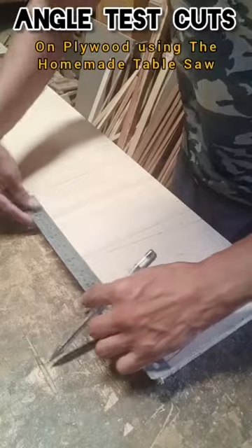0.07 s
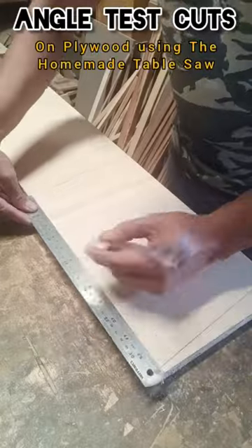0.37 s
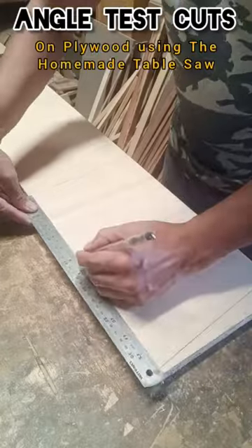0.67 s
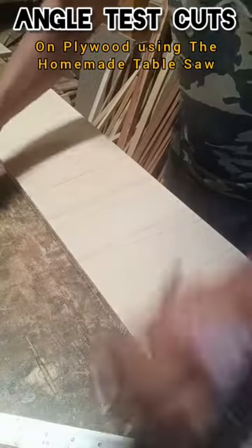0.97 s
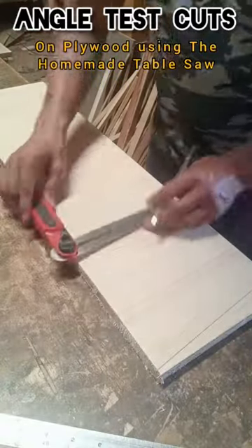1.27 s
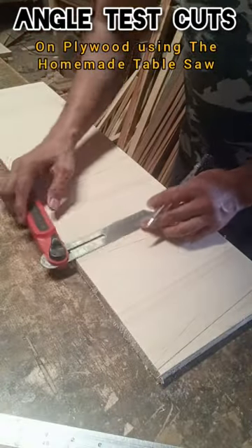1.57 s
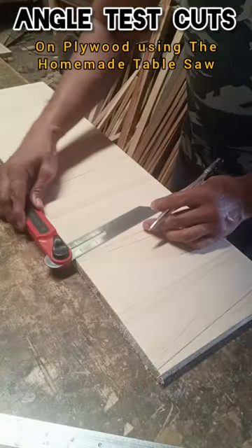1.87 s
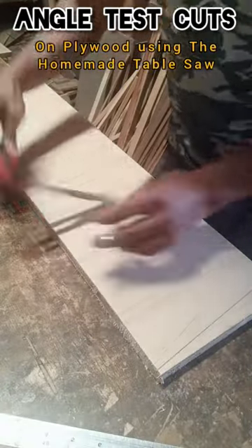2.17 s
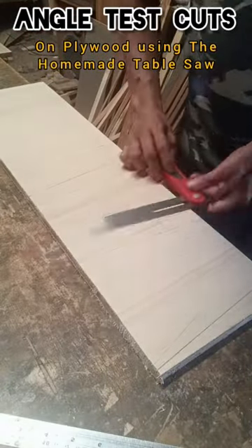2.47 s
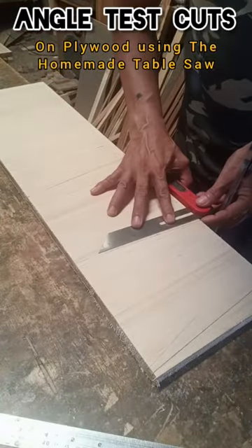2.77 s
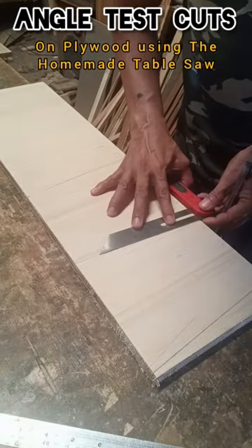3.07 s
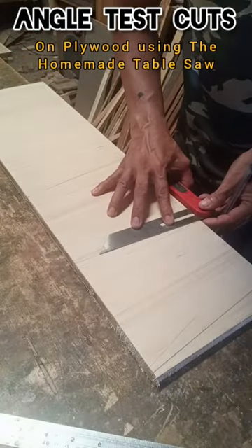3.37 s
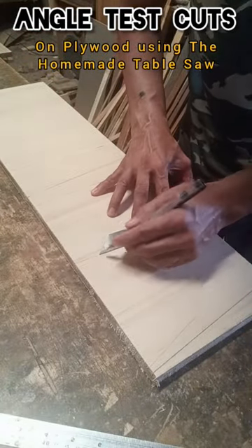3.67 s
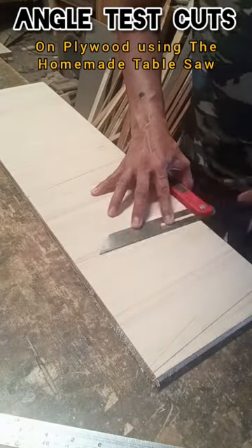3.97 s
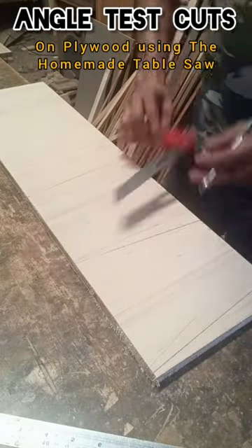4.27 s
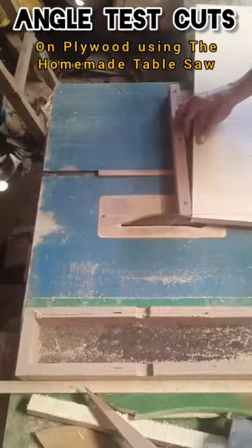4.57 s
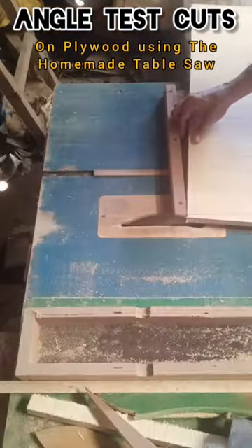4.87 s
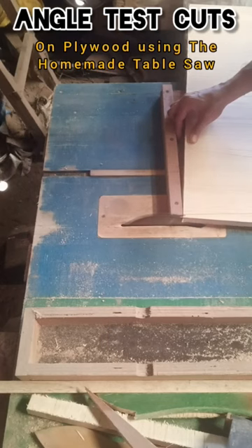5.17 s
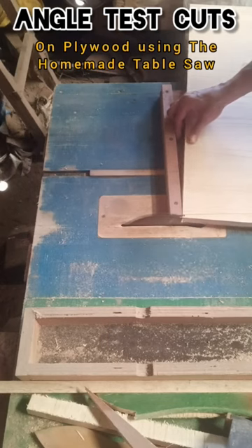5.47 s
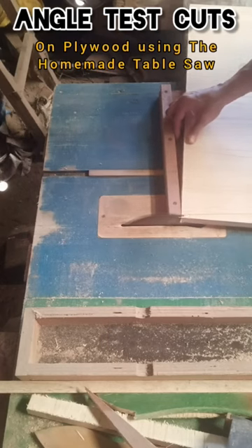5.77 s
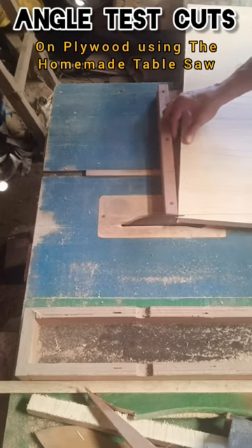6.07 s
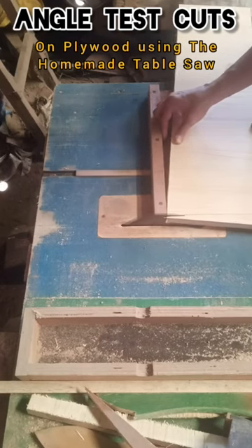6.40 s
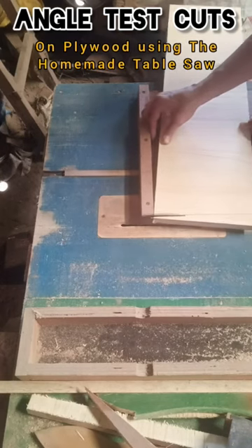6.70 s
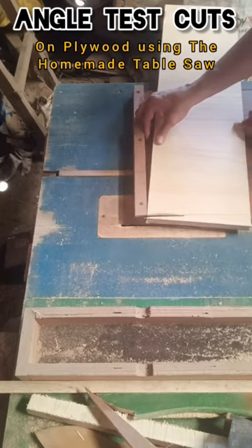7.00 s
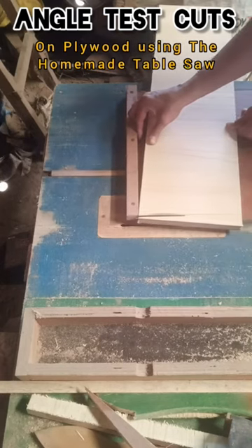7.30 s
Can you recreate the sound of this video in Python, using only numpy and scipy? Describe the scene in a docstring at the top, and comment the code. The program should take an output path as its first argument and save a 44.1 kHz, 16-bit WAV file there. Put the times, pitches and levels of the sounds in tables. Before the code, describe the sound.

Quiet scrapes, knocks and pencil strokes on plywood in a workshop, then a loud table saw suddenly runs and cuts the board.

```python
"""A workshop, through a stereo microphone pair. First, at the bench and a little to the right, a steel rule
and a bevel gauge are slid and set down on a plywood board. A pencil marks it as a distant rumble swells.
At 4.45 s the scene cuts to a table saw running close by: the motor hums and whines, the teeth churn the air.
Then the plywood is fed in: the teeth chop it and fling out chips and dust, the blade rings and squeals,
and toward the end the speed sags and the blade's draught thumps the microphones."""
import sys
import numpy as np
from scipy import signal
from scipy.fft import rfft, irfft
from scipy.io import wavfile
from scipy.ndimage import uniform_filter1d, map_coordinates

SR = 44100
rng = np.random.default_rng(int(sys.argv[2]) if len(sys.argv) > 2 else 0)


def inscribe(sig):
    """Save sig as 16-bit PCM at rate SR to the path in sys.argv[1].

    A 1-D sig is mono; a 2-D sig holds one channel per row.
    Samples are clipped to [-1, 1] before scaling.
    """
    pcm = np.round(np.clip(np.atleast_2d(sig).T, -1, 1) * 32767)
    wavfile.write(sys.argv[1], SR, pcm.astype(np.int16))


N = 323694
TIME, HZ = np.arange(N) / SR, np.fft.rfftfreq(N, 1 / SR)


def amp(db):
    """Decibels to gain."""
    return 10 ** (np.asarray(db) / 20)

def unit(x):
    """Scales to rms 1."""
    return x / np.sqrt(np.mean(x ** 2) + 1e-20)

def curve(points):
    """Joins (time, value) points by straight lines."""
    return np.interp(TIME, *np.transpose(points))

def spectrum(points):
    """Joins (frequency, value) points on a log-frequency axis."""
    hz, value = np.transpose(points)
    return np.interp(np.log(HZ + 1), np.log(hz + 1), value)

def tone(points):
    """Gain per frequency from (frequency, dB) points."""
    return amp(spectrum(points))

def peaks(modes):
    """Gain of resonances given as (frequency, width, dB)."""
    return sum(amp(db) / (1 + (2 * (HZ - hz) / width) ** 2) for hz, width, db in modes)

def colour(x, gain):
    """Filters x by a gain per frequency; rms 1."""
    return unit(irfft(rfft(x) * gain, N))

def noise():
    """Two unrelated white noises."""
    return rng.standard_normal((2, N))

def wander(rate_hz):
    """Random drift of rms 1."""
    knots = rng.standard_normal(int(2 * rate_hz * N / SR) + 2)
    return unit(np.interp(TIME * 2 * rate_hz, np.arange(len(knots)), knots))

def bump(at, width, shape=2):
    """A smooth rise and fall: 1 at its centre, 1/e one width to either side."""
    return np.exp(-np.minimum(abs((TIME - at) / width), 9) ** shape)

def patchy(x, depth_db, bins, frames):
    """Narrow bands swell and fade each on their own."""
    bands = signal.stft(x, nperseg=1024)[2]
    field = uniform_filter1d(rng.standard_normal(bands.shape[1:]), bins, axis=0)
    field = unit(uniform_filter1d(field, frames, axis=1))
    return unit(signal.istft(bands * amp(depth_db * field), nperseg=1024)[1][:, :N])

def mic_pair(pair, likeness, balance_db=0, lead=0):
    """Two signals become a left and a right microphone whose middle keeps its level."""
    a, b = rfft(pair)
    tilt = amp(balance_db / 2)
    right = (likeness * a * np.exp(-1j * lead) + np.sqrt(1 - likeness ** 2) * b) / tilt
    middle = np.sqrt(tilt ** 2 + tilt ** -2 + 2 * likeness * np.cos(lead)) / 2
    return irfft(np.array([a * tilt, right]) / middle, N)


# distant rumble: (time [s], level [dB]); its tone and the room air's: (frequency [Hz], level [dB])
RUMBLE_LEVEL = [(.1, -75.5), (1.6, -67), (2.65, -63), (3.45, -55), (4.0, -41.5), (4.2, -51), (4.44, -46)]
RUMBLE_TONE = [(30, -22), (90, -8), (170, -3), (222, 2.5), (300, -12), (400, -8), (500, -14.5), (700, -24),
               (2000, -35), (3500, -51), (15000, -57)]
AIR_TONE = [(15, -32), (25, 3), (109, 6), (250, -8), (749, -16.5), (1580, -18.5), (3010, -32.5),
            (15000, -41)]
def room_tone():
    """Still workshop air, and a low rumble swelling in the distance."""
    rumble = amp(curve(RUMBLE_LEVEL)) * colour(noise(), tone(RUMBLE_TONE))
    air = amp(-67) * colour(noise(), tone(AIR_TONE))
    return rumble + air

def friction(gain, grain_db):
    """Sliding catches on the wood grain, so the hiss comes in tiny clumps."""
    return colour(noise() * amp(grain_db * wander(400)), gain)

def stroke(at, width, db):
    """Power of one hand movement, speeding up and slowing down."""
    return amp(db) ** 2 * bump(at, width, shape=1.78)

# hiss of rubbed plywood: (frequency [Hz], level [dB])
HISS_TONE = [(1700, 3.5), (3700, -3), (4800, -0.5), (6500, -7.5), (8200, -5), (9400, 0), (11000, -14.5),
             (13000, -10), (15500, -15)]
# pencil strokes: (time [s], width [s], hiss [dB], board [dB])
PENCIL_STROKES = [(0.351, 0.0074, -74, -67), (3.738, 0.0083, -68, -49), (3.891, 0.027, -51, -36.5),
                  (3.927, 0.01, -48.5, -47), (4.053, 0.039, -63.5, -38.5)]
# pencil squeaks: (time [s], width [s], level [dB])
SQUEAKS = [(3.7, 0.016, -68), (3.812, 0.023, -62)]
def pencil():
    """The lead hisses over the grain, drums on the board and now and then squeaks."""
    hiss = np.sqrt(sum(stroke(at, width, db) for at, width, db, _ in PENCIL_STROKES))
    drum = np.sqrt(sum(stroke(at, width, db) for at, width, _, db in PENCIL_STROKES))
    squeak = np.sqrt(sum(stroke(*row) for row in SQUEAKS))
    return (hiss * friction(tone(HISS_TONE), grain_db=3.5)
            + drum * friction(peaks([(214, 57, 7), (442, 130, 1.5), (1500, 870, -30)]), grain_db=2)
            + squeak * friction(peaks([(2330, 800, 0)]), grain_db=3.5))

# the rule's scrape: (time [s], level [dB]) and (frequency [Hz], level [dB])
RULE_LEVEL = [(.94, -66), (.962, -39.5), (.99, -29), (1.008, -31), (1.022, -46), (1.05, -67)]
RULE_TONE = [(60, -27), (170, 4.5), (400, 4.5), (2100, -2.5), (2500, -8.5), (6700, -11.5), (7500, 2),
             (8700, -3), (10500, -25), (15000, -25)]
def rule():
    """The steel rule scrapes across the board's edge."""
    sliding = (TIME > RULE_LEVEL[0][0]) & (TIME < RULE_LEVEL[-1][0])
    return sliding * amp(curve(RULE_LEVEL)) * friction(tone(RULE_TONE), grain_db=1)

# the gauge slides: (time [s], width [s], level [dB], extra weight on the board [dB])
SLIDES = [(0.696, .012, -66, -2), (1.192, 0.0056, -29, -12), (1.219, 0.015, -38, -5.5),
          (1.242, 0.014, -39.5, 2.5), (1.289, 0.023, -50, 1), (1.361, 0.0098, -49.5, -6),
          (1.464, 0.026, -54, -1), (1.568, 0.015, -43.5, -12), (1.661, 0.0096, -60, 4.5),
          (1.971, .017, -53.5, -6), (2.032, .026, -54.5, 0), (2.323, 0.018, -55, 11.5),
          (2.372, 0.018, -49, 8.5), (2.469, 0.013, -40, -0.5), (2.533, 0.02, -47.5, -3)]
# it is whisked off: (time [s], width [s], hiss [dB], ring [dB])
LIFTS = [(2.216, 0.017, -47, -45), (4.288, 0.026, -53.5, -65)]
# the shaken board: (frequency [Hz], level [dB])
BOARD_TONE = [(70, -23), (140, -5.5), (190, 5), (270, -4), (400, -7), (700, -11.5), (1100, -58)]
# the gauge's blade: (frequency [Hz], width [Hz], level [dB])
GAUGE_MODES = [(802, 98, -3.5), (1034, 61, -4), (1344, 190, -3), (1650, 150, -6), (2096, 115, 6),
               (2314, 290, -1.5), (3210, 120, -13.5), (3790, 90, -12.5), (4680, 160, -18.5),
               (5070, 110, -15)]
def bevel_gauge():
    """Sliding the gauge shakes the board, rings its steel blade and hisses; lifting rings and hisses."""
    slide = sum(stroke(at, width, db) for at, width, db, _ in SLIDES)
    press = sum(stroke(at, width, db + weight_db) for at, width, db, weight_db in SLIDES)
    lift_hiss = sum(stroke(at, width, db) for at, width, db, _ in LIFTS)
    lift_ring = sum(stroke(at, width, db) for at, width, _, db in LIFTS)
    board = np.sqrt(press) * friction(tone(BOARD_TONE), grain_db=5.5)
    steel = patchy(friction(peaks(GAUGE_MODES), grain_db=4.5), depth_db=1.5, bins=4, frames=4)
    hiss = np.sqrt(amp(-13) ** 2 * slide + lift_hiss) * friction(tone(HISS_TONE), grain_db=2.5)
    return board + np.sqrt(slide + lift_ring) * steel + hiss

# tools are set down: (time [s], relative level [dB], dull above [Hz])
KNOCKS = [(0.9572, -7.5, 4930), (1.185, -19.5, 8700), (1.35, -26, 2960), (1.442, -20.5, 1700),
          (1.49, -25.5, 3370), (1.655, -36, 2210), (2.028, -37, 3000), (2.189, -33, 6000),
          (2.326, -13, 600), (2.369, -13, 4340), (2.459, -21.5, 4000), (2.542, -18.5, 1920),
          (2.662, -42.5, 2500), (4.303, -20, 1000)]
# the board with the gauge on it: (frequency [Hz], level [dB], time to fall 60 dB [s])
BOARD_MODES = [(178.4, -24, .09), (353, -9.5, 0.032), (503, -10.5, 0.023), (880, -15.5, 0.055),
               (1310, -2, 0.012), (1910, -2, 0.024), (2330, -18.5, .05), (3030, -22, .04),
               (4520, -11.5, 0.02)]
def knocks(crack_s=0.0018):
    """Each blow makes a contact crack and rings the modes of the board."""
    out, t = np.zeros((2, N)), TIME[:SR // 5]
    for at, db, dull_hz in KNOCKS:
        ring = sum(amp(mode_db - 60 * t / t60) * np.sin(2 * np.pi * (hz * t + 1.6 * rng.random((2, 1))))
                   for hz, mode_db, t60 in BOARD_MODES)
        crack = amp(3) * rng.standard_normal((2, len(t))) * np.exp(-t / crack_s)
        knock = signal.lfilter(*signal.butter(2, dull_hz, fs=SR), ring + crack)
        start = round(at * SR)
        out[:, start:start + len(t)] += amp(db - 15) * knock
    return out

# microphones at the bench: (frequency [Hz], left-right likeness [0-1])
BENCH_LIKENESS = [(130, 1), (300, 0.91), (700, 0.55), (1400, .2), (15000, 0.22)]
# the hands, right of centre: (time [s], left minus right [dB])
HANDS_PAN = [(1.0, -2), (1.6, -3.5), (2.2, -1.3)]
def bench():
    """At the bench: marking out the board, over the room tone."""
    likeness, pan = spectrum(BENCH_LIKENESS), amp(curve(HANDS_PAN) / 2)
    tools = mic_pair(bevel_gauge() + pencil() + rule() + knocks(), likeness)
    room = mic_pair(room_tone(), likeness, balance_db=-0.6) * (TIME > RUMBLE_LEVEL[0][0])
    return tools * np.array([pan, 1 / pan]) + room


# wind on the microphones: (time [s], width [s], level [dB])
BUFFETS = [(6.125, 0.027, -40), (6.714, 0.041, -33), (7.132, .045, -42), (7.285, .025, -38)]
def buffets():
    """The blade's draught thumps the microphones, mostly the right one."""
    gusts = sum(amp(db) * bump(at, width) for at, width, db in BUFFETS)
    return gusts * colour(noise(), peaks([(45, 99, 0)])) * amp([[-5], [4]])

# the saw's speed, as the pitch of its whine: (time [s], frequency [Hz])
WHINE_PITCH = [(4.46, 5152), (4.9, 5080), (5.25, 5033), (5.6, 5107), (5.75, 5068), (6.12, 5058),
               (6.6, 4964), (6.78, 4857), (7.02, 4862), (7.15, 4796), (7.34, 4820)]
WHINE_PER_TURN = 56.28
def shaft_turns():
    """Turns made so far by the shaft, which slows under load."""
    return np.cumsum(curve(WHINE_PITCH) / WHINE_PER_TURN) / SR

def feed_db(open_db, covered, loaded):
    """A layer's level, shifted in dB as the board covers the blade and as load drags the speed down."""
    cover = np.clip((TIME - 4.69) / 1.46, 0, 1)
    easy_hz, full_sag_hz = 5057, 267
    load = np.clip((easy_hz - curve(WHINE_PITCH)) / full_sag_hz, 0, 1)
    return open_db + cover * covered + load * loaded

def shudder(judder_db):
    """Under load the board shudders on the table."""
    level = amp(feed_db(-49.5, covered=6.4, loaded=9.6) + judder_db)
    return level * colour(noise(), peaks([(110, 83, -1.2), (260, 42, 1)]))

def shaft_tone(turns, multiple, db, flutter_hz, phase_hz, flutter_db=2.6, phase_rad=0.5):
    """A tone locked to the rotation, fluttering in level and phase."""
    level = amp(db + flutter_db * wander(flutter_hz))
    return level * np.sin(2 * np.pi * multiple * turns + phase_rad * wander(phase_hz))

# the shaft's hum: (time [s], level [dB]); its buzz: (multiple of shaft speed, relative level [dB])
HUM_LEVEL = [(4.48, -24.5), (5.25, -28), (5.32, -34.5), (5.65, -30), (5.72, -32.5), (6.1, -30.5),
             (7.3, -28.5)]
BUZZ_ORDERS = [(3, -5), (5, -9), (7, -16.5), (13, -11.5)]
def hum(turns, dip_db, judder_db):
    """The unbalanced shaft hums and buzzes on odd orders; load brings up the second."""
    shaft = amp(curve(HUM_LEVEL) + 0.6 * wander(9.8)) * np.sin(2 * np.pi * turns)
    buzz_db = feed_db(-25.5, covered=-6.5, loaded=-7) + dip_db
    buzz = sum(shaft_tone(turns, k, buzz_db + db, flutter_hz=8.5, phase_hz=11.8,
                          flutter_db=1.7 * np.log(k), phase_rad=0.11 * k) for k, db in BUZZ_ORDERS)
    labour_db = feed_db(-56, covered=8, loaded=10) + judder_db
    labour = amp(labour_db) * np.sin(4 * np.pi * turns + 0.23 * wander(12))
    return np.sqrt(2) * (shaft + buzz + labour)

# tooth passing and its overtones: (multiple of shaft speed, level [dB])
TOOTH_ORDERS = [(30, -35), (60, -42), (90, -36)]
def whine(turns):
    """The motor's whine, which fades once for a moment, and the siren of the passing teeth."""
    motor_db = feed_db(-31, covered=-0.57, loaded=5.45) - 15 * bump(6.45, 0.094)
    motor = shaft_tone(turns, WHINE_PER_TURN, motor_db, flutter_hz=32, phase_hz=27)
    teeth = sum(shaft_tone(turns, k, db, flutter_hz=30, phase_hz=25) for k, db in TOOTH_ORDERS)
    return motor + amp(feed_db(0, covered=1, loaded=-28)) * teeth

def throb(turns, depth):
    """Uneven teeth make the noise swell in the same way on every turn."""
    pattern = sum(np.cos(2 * np.pi * (k * turns + rng.random())) / k ** 0.26 for k in range(1, 7))
    return unit(np.exp(depth * unit(pattern)))

def tooth_blows(turns, rough, orders=192, patterns_per_s=6):
    """Blows that repeat with each turn of the blade and slowly change, plus random splintering."""
    phases = rng.random((2, 96, orders + 1))
    patterns = irfft(np.exp(2j * np.pi * phases), 16 * orders)  # each spans one turn
    where = [TIME * patterns_per_s, turns % 1 * patterns.shape[-1]]
    blows = np.array([map_coordinates(side, where, order=1, mode="grid-wrap") for side in patterns])
    return unit(blows) + rough * noise()

# air around the blade: (frequency [Hz], level [dB])
ROAR_TONE = [(30, -18), (130, -7.5), (200, -9), (270, 5.5), (350, -0.5), (470, 0.5), (750, 0), (1150, 3),
             (1950, 2.5), (2300, -2), (2700, -3), (3100, -10), (3700, -6), (5500, -10), (8000, -11),
             (15000, -51)]
def roar(turns, swell, dip_db):
    """The teeth churn the air into a broad roar."""
    churn = patchy(tooth_blows(turns, rough=2.45), depth_db=2, bins=4, frames=5) * swell
    return amp(feed_db(-20, covered=-5, loaded=0.88) + dip_db) * colour(churn, tone(ROAR_TONE))

def howl(swell, dip_db):
    """Air whistles through the gullets between the teeth, louder at first."""
    db = feed_db(-28, covered=-4.5, loaded=5.6) + 3.9 * bump(4.57, 0.17) + dip_db
    return amp(db) * colour(noise() * swell, peaks([(1473, 130, 0)]))

# pushes on the board: (time [s], width [s], ringing [dB], strongest near [Hz], chips [dB], dust [dB])
BITES = [(5.453, 0.091, -27, 2460, -24.5, -43), (5.715, .045, -23.5, 2220, -19.5, -30),
         (5.852, 0.038, -31.5, 2070, -26, -34), (5.948, 0.064, -21, 2050, -23.5, -37),
         (6.244, 0.034, -23, 2800, -42, -36), (6.413, 0.041, -23.5, 2420, -44, -36),
         (6.51, 0.087, -23.5, 1545, -31.5, -23), (6.68, .05, -29.5, 1560, -32, -23),
         (7.083, 0.035, -23, 1450, -25.5, -41), (7.293, 0.13, -24.5, 1900, -52, -47)]
# the saw blade: (frequency [Hz], width [Hz], level [dB])
SAW_MODES = [(1424, 130, 4), (1560, 95, 5), (1890, 96, 9), (1923, 53, 1.5), (2443, 100, 5),
             (2592.5, 160, -11), (2960, 27, 7), (4200, 120, 10)]
def bites(blows, spread_octaves=0.63):
    """At each push the teeth bite and ring the blade's resonances, some more than others."""
    ringing, out = colour(blows, peaks(SAW_MODES)), np.zeros((2, N))
    for at, width, db, hz, _, _ in BITES:
        near = abs(TIME - at) < 3 * width
        octaves = np.log2((np.fft.rfftfreq(near.sum(), 1 / SR) + 1) / hz)
        emphasis = 1 / (1 + (octaves / spread_octaves) ** 2) ** 2
        ring = unit(irfft(rfft(ringing[:, near]) * emphasis, near.sum()))
        out[:, near] += amp(db) * bump(at, width)[near] * ring
    return out

# coarse chips and fine dust: (frequency [Hz], level [dB])
CHIP_TONE = [(1500, -10.5), (3800, 0.5), (5500, -4), (7400, -2.5), (8900, 6), (9700, 4), (10600, -1.5),
             (12000, -35)]
DUST_TONE = [(9500, -36), (11000, -3.5), (12200, 6.5), (12800, 7.5), (13500, -2), (14500, 2), (15400, 1.5)]
def sawdust(turns, swell, dip_db):
    """The teeth fling out chips and dust in uneven bursts, more at each bite."""
    debris = patchy(tooth_blows(turns, rough=1), depth_db=3.5, bins=5, frames=6)
    debris *= swell * amp(0.59 * wander(1620) + 1.86 * wander(40))
    chip_bursts = sum(amp(db) * bump(at, width) for at, width, _, _, db, _ in BITES)
    dust_bursts = sum(amp(db) * bump(at, width) for at, width, _, _, _, db in BITES)
    chip_gain = np.hypot(amp(feed_db(-25.5, covered=0.26, loaded=-1.86) + dip_db), chip_bursts)
    dust_gain = np.hypot(amp(feed_db(-24, covered=-2, loaded=1.63) + dip_db), dust_bursts)
    return chip_gain * colour(debris, tone(CHIP_TONE)) + dust_gain * colour(debris, tone(DUST_TONE))

# teeth on plywood: (frequency [Hz], level [dB])
CHOP_TONE = [(900, -16), (1400, 16), (1950, 6.5), (2150, -8.5), (2650, 16), (3100, -19), (4400, -9),
             (7000, -23), (9700, -33), (11000, -19)]
def chop(blows, dip_db):
    """The teeth chop the wood, louder as it covers the blade and weaker under load."""
    return amp(feed_db(-41.5, covered=11.9, loaded=-18) + dip_db) * colour(blows, tone(CHOP_TONE))

# blade squeals: (time [s], width [s], multiple of shaft speed, level [dB])
SQUEALS = [(5.74, 0.049, 67, -27), (5.78, 0.11, 69, -31), (5.98, 0.091, 21, -22.5), (5.96, 0.18, 109, -29),
           (6.41, 0.034, 28, -22), (7.283, .05, 23, -23.5), (7.31, 0.14, 51, -26.5)]
def squeals(turns):
    """The blade rubs the kerf; a resonance locks onto the rotation and sings with a rasp."""
    return sum(bump(at, width) * shaft_tone(turns, k, db, flutter_hz=41, phase_hz=40)
               for at, width, k, db in SQUEALS)

# the level dips briefly: (time [s], width [s], body [dB], treble [dB])
DIPS = [(5.349, 0.049, -6, -8.5), (5.567, 0.12, 0, -6.5)]
# microphones close to the saw:
SAW_LIKENESS = [(100, 0.96), (900, 0.82), (2000, 0.85), (3500, 0.36), (5000, 0.46), (6800, 0.67),
                (8000, 0.62), (9200, .15), (11800, 0.34), (12900, 1), (15000, .25)]  # (frequency [Hz], left-right likeness [0-1])
SAW_BALANCE = [(100, 0.5), (1600, 0.5), (3500, -1), (4700, -10), (5400, -5), (6500, -19.5), (7700, -3.5),
               (8700, 4), (9900, 27), (11200, 3.5), (14200, -6), (14900, -10)]  # (frequency [Hz], left minus right [dB])
SAW_LEAD = [(1000, 0.054), (2500, 1.22), (4500, 1.16), (5200, 3), (6500, 1), (7200, 0.5)]  # (frequency [Hz], left phase lead [rad])
def table_saw():
    """Close to the saw: its noises spread between the microphones, its tones reach both coherently."""
    turns = shaft_turns()
    body_db = sum(db * bump(at, width) for at, width, db, _ in DIPS)
    treble_db = sum(db * bump(at, width) for at, width, _, db in DIPS)
    judder_db = 6.9 * bump(7.16, 0.079)  # the board judders once on the table
    swell, blows = throb(turns, depth=0.16), tooth_blows(turns, rough=0.58)
    air = roar(turns, swell, body_db) + howl(swell, treble_db)
    cutting = sawdust(turns, swell, treble_db) + chop(blows, body_db) + bites(blows) + shudder(judder_db)
    tones = hum(turns, body_db, judder_db) + whine(turns) + squeals(turns)
    balance_db, lead = spectrum(SAW_BALANCE), spectrum(SAW_LEAD)
    diffuse = mic_pair(air + cutting, spectrum(SAW_LIKENESS), balance_db, lead)
    return diffuse + mic_pair(np.array([tones, tones]), 1, balance_db, 0.65 * lead)


def scene(cut_s=4.452):
    """The bench, then a sudden change to the running saw."""
    at_saw = np.clip((TIME - cut_s) / 0.002, 0, 1)
    return (1 - at_saw) * bench() + at_saw * (table_saw() + buffets())

def record(dry, ceiling=0.85, edge_hz=15650):
    """The loudest peaks are softly rounded; then the recorder's band limit."""
    rounded = dry / (1 + (dry / ceiling) ** 6) ** (1 / 6)
    lowpass = signal.firwin(511, edge_hz, window=("kaiser", 9), fs=SR)
    return signal.oaconvolve(rounded, lowpass[None], "same")


dry = scene()
out = record(dry)
inscribe(out)
```